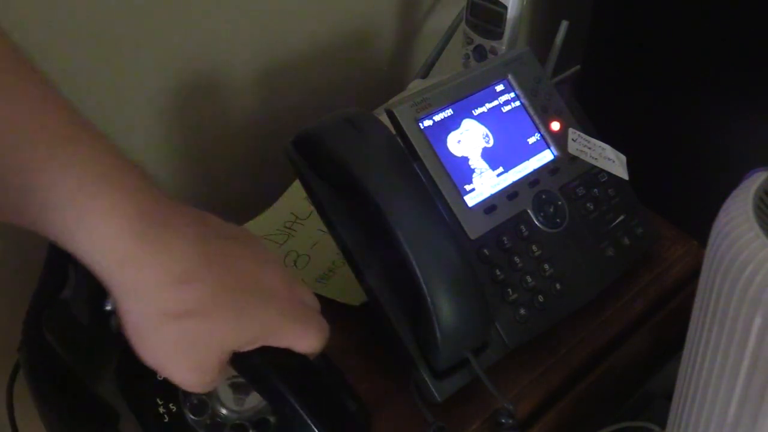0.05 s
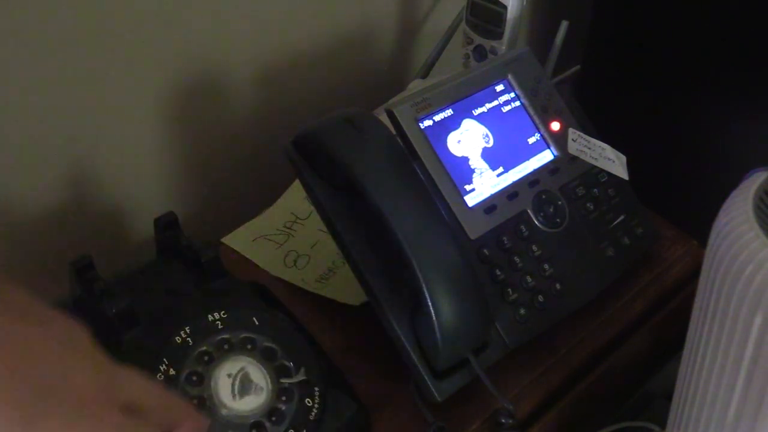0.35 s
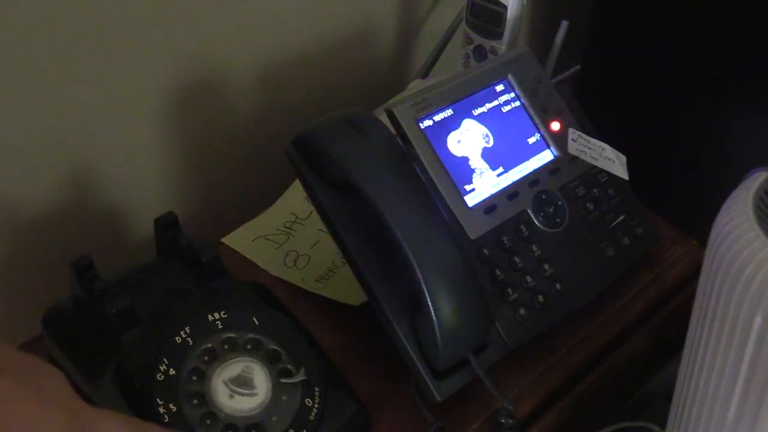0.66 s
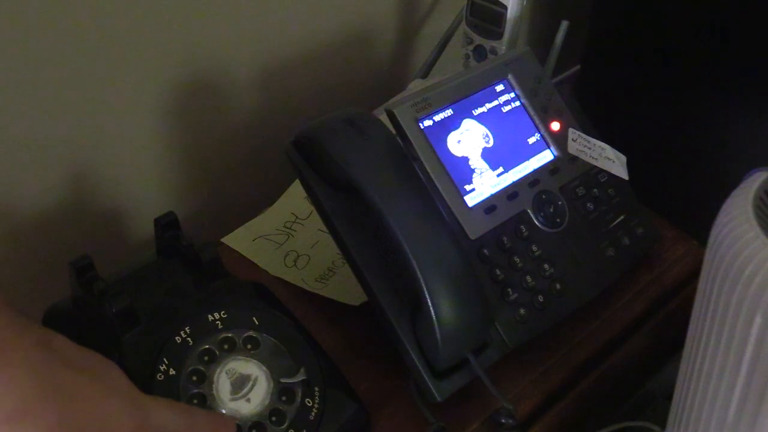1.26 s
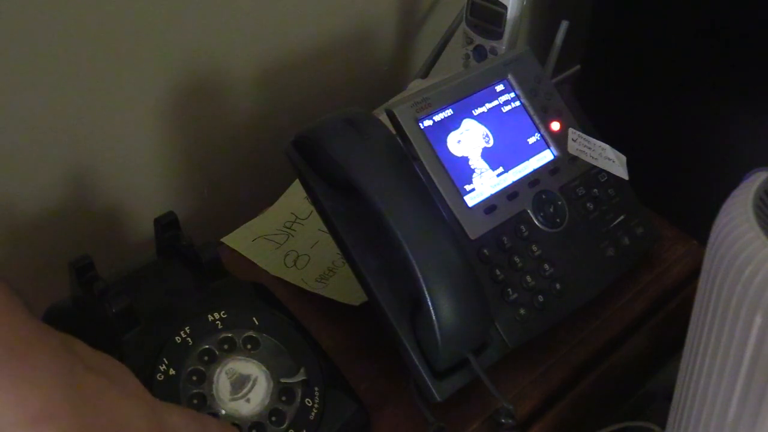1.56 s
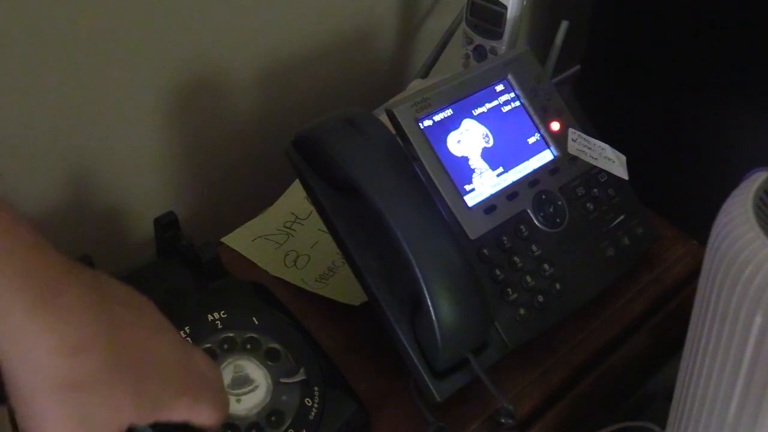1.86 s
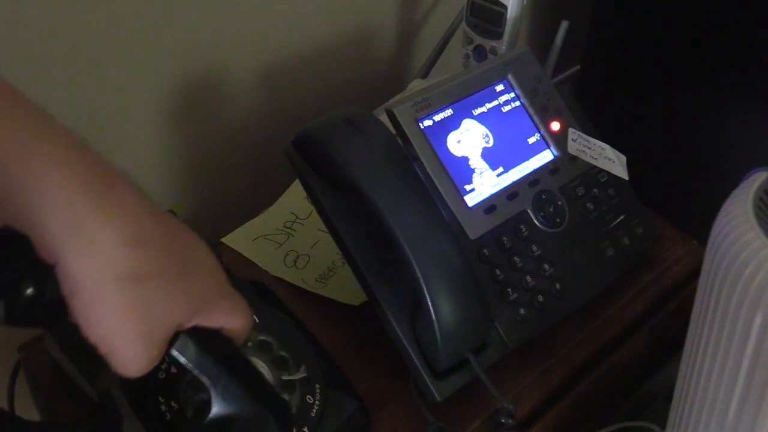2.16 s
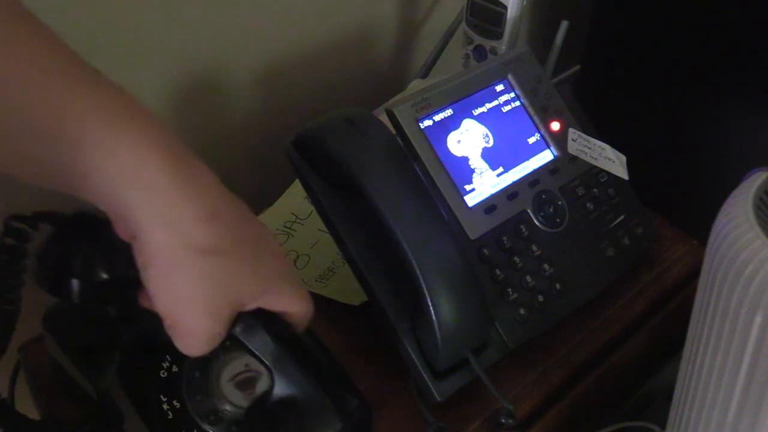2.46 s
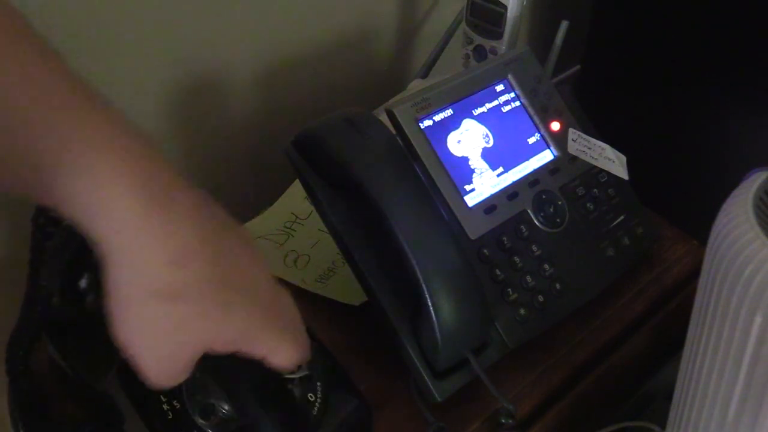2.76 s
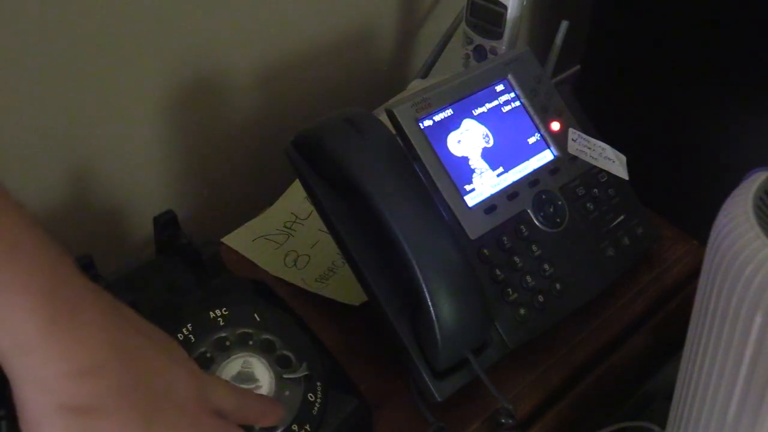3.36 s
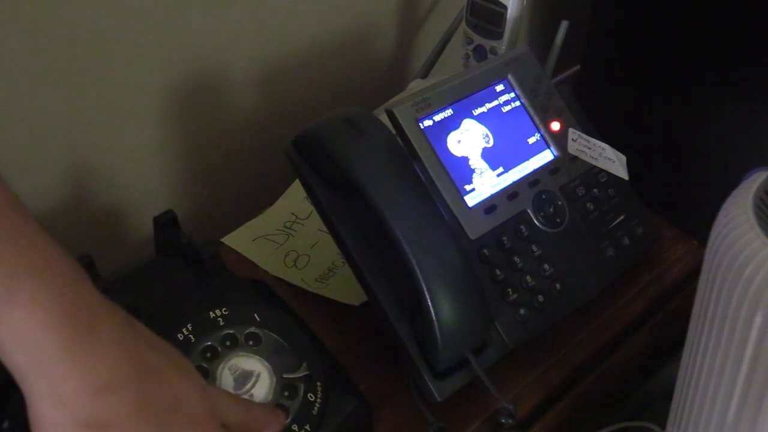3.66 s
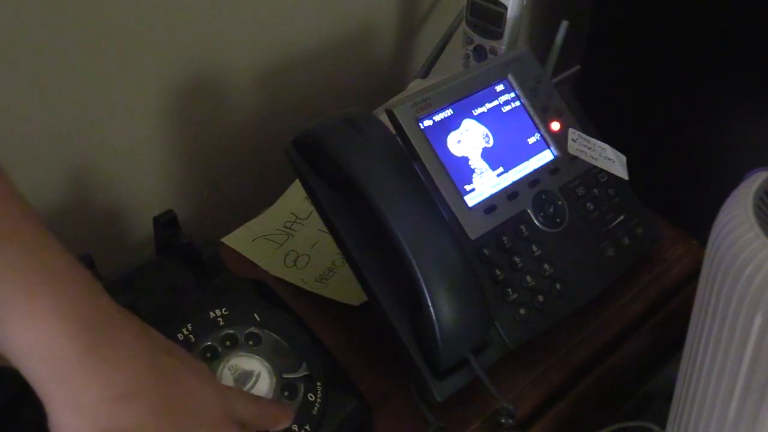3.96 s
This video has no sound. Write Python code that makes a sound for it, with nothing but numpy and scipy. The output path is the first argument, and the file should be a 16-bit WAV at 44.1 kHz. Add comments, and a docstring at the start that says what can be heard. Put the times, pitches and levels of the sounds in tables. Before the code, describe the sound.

Close to the microphone in a quiet room, an old rotary phone is dialed: a few clicks, a whirring return and a metallic clack, then ticking winding, more knocks, and a second whir ending in a clack.

```python
"""An old rotary telephone, dialled on a desk in a quiet room, with one microphone on the left channel.
The finger lets go, the wheel whirs home against its governor and clacks into its rest.
It is wound again over a ticking ratchet, knocks on the finger stop, and runs home once more.
The case rings with the knocks and the hand bumps the telephone on the desk. Behind it are a short
echo and the room's low rumble; the idle right channel carries only hiss."""
import sys
import numpy as np
from scipy import signal
from scipy.fft import rfft, irfft
from scipy.io import wavfile
from scipy.ndimage import uniform_filter1d

SR = 44100
rng = np.random.default_rng(int(sys.argv[2]) if len(sys.argv) > 2 else 0)


def store_wav(level_fs):
    """Save 16-bit WAV to argv[1]."""
    pcm = np.round(np.clip(np.atleast_2d(level_fs), -1, 1) * 32767)
    wavfile.write(sys.argv[1], SR, pcm.T.astype(np.int16))


N = 4 * SR
TIME = np.arange(N) / SR


def amp(db):
    """Decibels to gain."""
    return 10 ** (np.asarray(db) / 20)


def unit_rms(x):
    """Scales to rms 1."""
    return x / np.sqrt(np.mean(x ** 2) + 1e-20)


def fader(points):
    """A gain that moves through points of seconds and dB."""
    return amp(np.interp(TIME, *np.transpose(points)))


def curve_at(points, hz):
    """Reads a curve on a log-frequency axis."""
    point_hz, value = np.transpose(points)
    return np.interp(np.log(hz + 1), np.log(point_hz + 1), value)


def add(mix, start_s, sound):
    """Mixes a sound in at its start time."""
    part = mix[max(round(start_s * SR), 0):][:len(sound)]
    part += sound[:len(part)]


def colour(x, spectrum, modes=(), size=16384):
    """Causal filter of unit energy: a broad spectrum times ringing resonances."""
    hz = abs(np.fft.fftfreq(size, 1 / SR))
    boost = 1 + sum(amp(db) ** 2 / (1 + (2 * (hz - f) / width) ** 2) for f, width, db in modes)
    log_gain = np.log(amp(curve_at(spectrum, hz)) * np.sqrt(boost))
    minimum_phase = np.exp(np.conj(signal.hilbert(log_gain)))
    ring = np.fft.ifft(minimum_phase).real[:size // 2]
    return signal.oaconvolve(x, ring / np.linalg.norm(ring))[:N]


def tone(hz, t60):
    """One dying mode, falling at 60 dB per t60 seconds."""
    t = TIME[:SR // 4]
    return amp(-60 * t / t60) * np.sin(2 * np.pi * hz * t)


def ringing(force, modes):
    """A force rings a set of dying modes whose response has unit energy."""
    ring = sum(amp(db) * tone(hz, t60) for hz, db, t60 in modes)
    return signal.oaconvolve(force, ring / np.linalg.norm(ring))[:N]


def contact(decay_s, rise_s=0.00096, size=2048):
    """A short chattering contact that swells and dies, with the energy of 10 ms at level 1."""
    t = TIME[:size]
    fade = np.exp(-t / decay_s) * (1 - np.exp(-t / rise_s))
    force = rng.standard_normal(size) * fade
    for _ in range(3):  # flatten the spectrum, then restore the envelope
        spectrum = rfft(force)
        force = irfft(spectrum / (abs(spectrum) + 1e-12))
        force *= fade / np.sqrt(uniform_filter1d(force ** 2, size=64) + 1e-9)
    return force / np.linalg.norm(force) * np.sqrt(SR / 100)


def grit(spread_db=3, grain_samples=25):
    """Dense tiny impacts of uneven size."""
    noise = rng.standard_normal(N)
    unevenness = uniform_filter1d(rng.standard_normal(N), grain_samples) * np.sqrt(grain_samples)
    return unit_rms(noise * amp(spread_db * unevenness))


# Resonances of the case and dial plate, heard in most of the dial's sounds.
# Each row: frequency in Hz, width in Hz, boost in dB.
CASE_MODES = [(543.7, 20, 18.5), (597, 19.4, 13.5), (640, 26.6, 15), (881, 34, 7.5), (1033, 27, 11.5),
              (1146, 38, 14), (1597, 78, 7.5), (1896, 80, 4.5), (2091, 57, 8.5), (2740, 31, 3.5),
              (3127, 58, 4.5), (3580, 15, 10), (3996, 58, 3.5)]
# Knocks at the dial. Each row: start in seconds, an unused peak level, then case, low-mid, mid,
# treble and top levels in dB before each band's trim, decay in seconds.
KNOCKS = [(0.0, -19, -28.5, -40, -36.5, -42.5, -47.5, 0.0052), (0.01, -27, -30, -53, -41, -47, -53, 0.0045),
          (0.021, -30, -40, -44, -50, -46, -53, 0.0066),
          (0.042, -23, -25.5, -40.5, -45.5, -56, -59, 0.0043),
          (0.082, -30, -34.5, -45.5, -41.5, -44.5, -46, 0.0079),
          (0.166, -26, -32.5, -42.5, -37.5, -40, -45.5, 0.0049),
          (0.179, -3, -36, -47, -36, -41, -53, 0.0045), (0.194, -24, -29, -55.5, -58, -43, -53, 0.0044),
          (1.885, -36, -39, -72, -54.5, -53, -55, 0.0055), (2.001, -31, -39.5, -45, -45, -54, -69, 0.0071),
          (2.061, -35, -38, -47.5, -49, -62, -66, 0.004), (2.183, -31, -41.5, -47, -47, -61, -70, 0.0042),
          (2.215, -30, -44, -50, -44, -53, -67, 0.0036), (2.272, -29, -63, -56, -44.5, -48.5, -58, 0.0031),
          (2.595, -17, -33.5, -41.5, -34, -34, -30, 0.0049),
          (2.602, -24, -30, -42.5, -40.5, -42, -45, 0.0033), (2.62, -23, -30, -46, -43, -42, -38, 0.004),
          (2.638, -29, -47, -66, -44, -43.5, -43, 0.0028), (2.683, -33, -35, -42.5, -39, -44, -48, 0.0039),
          (2.753, -35, -36.5, -55, -48.5, -58, -59, 0.003),
          (2.774, -24, -33.5, -48, -48.5, -52, -49.5, 0.0034),
          (2.817, -26, -37, -46.5, -39.5, -51, -48.5, 0.0054),
          (2.85, -29, -64, -47.5, -61, -48.5, -50.5, 0.004)]
# One spectrum for each of those five bands. Each point: frequency in Hz, gain in dB.
KNOCK_SPECTRA = [
    [(50, 3.5), (200, -0.5), (420, -3), (600, -12), (900, -14.5), (2500, -57)],
    [(400, -37), (880, 5.5), (1300, 5), (1900, 7), (3200, -46)],
    [(1100, -31), (2200, 5), (4200, 4.5), (6000, -13)],
    [(3500, -43), (5400, 9), (7600, 4), (10000, -36)],
    [(6000, -23), (8400, 8.5), (11000, -1), (15500, -24)],
]

def knocks(trims_db=(-5, -0.5, -2, -1.5, -3.5)):
    """Finger and wheel knock on the stop and in the holes, each knock dull or bright in its own way."""
    out = np.zeros(N)
    for band, spectrum in enumerate(KNOCK_SPECTRA):
        force = np.zeros(N)
        for start, _, *levels_db, decay_s in KNOCKS:
            add(force, start, amp(levels_db[band] + trims_db[band]) * contact(decay_s))
        out += colour(force, spectrum, CASE_MODES)
    return out


# Friction at the shaft. Each row: time in seconds, level in dB.
RUB_LEVELS = [(0, -40.5), (.05, -44), (.13, -51), (.165, -54), (.24, -88), (1.6, -72), (1.76, -59),
              (1.95, -52.5), (2.15, -53.5), (2.3, -46), (2.44, -48), (2.52, -46), (2.6, -44.5), (2.7, -65),
              (2.76, -51), (2.83, -49), (2.9, -91)]
# Its colour. Each row: frequency in Hz, gain in dB.
RUB_SPECTRUM = [(60, 7), (300, -8.5), (600, -1.5), (800, -6.5), (1400, -11.5), (2200, -8.5), (3300, -14),
                (3750, -6.5), (4500, -16), (5600, -15), (6600, -9.5), (8200, -19.5), (10000, -20),
                (15000, -35)]
# Its thin ring. Each row: frequency in Hz, relative level in dB, t60 in seconds.
RUB_MODES = [(3670, 4, 0.14), (3830, -12, .05), (6440, -2, 0.022)]

def shaft_rub():
    """The wheel rubs on its shaft under the finger."""
    friction = grit() * fader(RUB_LEVELS)
    return colour(friction, RUB_SPECTRUM, CASE_MODES) + 0.17 * ringing(friction, RUB_MODES)


# The heavier presses. Each row: start in seconds, level in dB.
PRESSES = [(.010, -33), (.043, -31.5), (.082, -35.5), (.961, -41.5), (2.25, -58), (2.597, -56), (2.62, -52)]
# The housing's low modes. Each row: frequency in Hz, relative level in dB, t60 in seconds.
HOUSING_MODES = [(137.6, -6, 0.43), (193, 3.5, 0.17), (267, -0.5, 0.13), (367.6, -0.5, 0.32),
                 (436.7, 0, 0.35)]

def housing_booms():
    """The hollow housing rings when it is pressed hard."""
    force = np.zeros(N)
    for start, db in PRESSES:
        add(force, start, amp(db) * contact(decay_s=0.002))
    return ringing(force, HOUSING_MODES)


# Knocks that leave a clear pitch. Each row: start in seconds, pitch in Hz, level in dB, t60 in seconds.
CHINKS = [(.044, 1180, -33, 0.053), (0.168, 5450, -40, .05), (.194, 7200, -41, .05),
          (2.002, 2500, -44, .05), (2.217, 2300, -37, 0.028), (2.597, 2280, -37, .06),
          (2.620, 595, -24, 0.062), (2.684, 950, -39.5, 0.1), (2.683, 3300, -41.5, 0.073),
          (2.753, 4000, -38, 0.039), (2.774, 3800, -44, 0.044), (2.851, 7400, -38.5, 0.047)]

def chinks():
    """The wheel and the finger stop ring briefly after a knock."""
    out = np.zeros(N)
    for start, hz, db, t60 in CHINKS:
        add(out, start, amp(db) * tone(hz, t60))
    return out


# The wheel's runs home. Each row: start and end in seconds, level in dB, governor turns per second,
# a moment in seconds at which a turn begins.
RETURNS = [(0.167, 0.96, -42.5, 18.8, .251), (2.788, 3.614, -42, 18.72, 2.903)]
# The governor's catches. Each row: place as a share of the turn, gear weight, brake weight.
CATCHES = [(0.352, 0.94, 1.1), (0.701, 0.17, .35), (0.929, 0.67, 2.3)]
# The colours of gears and brake. Each row: frequency in Hz, gain in dB.
GEAR_SPECTRUM = [(40, -8.5), (150, -2), (300, 0.5), (470, -5), (540, -1), (640, -1.5), (730, -8.5),
                 (1130, -7.5), (1350, -14), (1900, -9), (3200, -13.5), (4500, -19), (9000, -29),
                 (15000, -42)]
BRAKE_SPECTRUM = [(1000, -25), (3000, 8), (4500, 0), (6500, 2), (8700, -1.5), (11000, -8.5), (15000, -30)]
# The gear train's hum. Each row: frequency in Hz, relative level in dB, t60 in seconds.
HUM_MODES = [(549, -0.72, 0.56), (600.6, 0.61, 0.25), (637.6, -2.9, 0.17)]

def return_whir(run_up_s=0.018, slack_db_per_s=-0.5, catch_decay_turns=0.19):
    """Gears chatter and the governor's brake hisses, catching three times in every turn."""
    gears, brake = np.zeros((2, N))
    for start, end, db, turns_per_s, turn_start in RETURNS:
        running = np.clip((TIME - start) / run_up_s, 0, 1) * (TIME < end)
        level = running * amp(db + slack_db_per_s * (TIME - (start + end) / 2))
        turns = (TIME - turn_start) * turns_per_s
        gear_drive, brake_drive = 0.47, 0.21  # the steady part under the catches
        for place, gear_weight, brake_weight in CATCHES:
            catch = np.exp(-((turns - place) % 1) / catch_decay_turns)
            gear_drive += gear_weight * catch
            brake_drive += brake_weight * catch
        gears += level * unit_rms(gear_drive)
        brake += level * unit_rms(brake_drive)
    hum = amp(-8) * ringing(gears * grit(), HUM_MODES)
    chatter = colour(gears * grit(), GEAR_SPECTRUM, CASE_MODES)
    hiss = amp(-17) * colour(brake * grit(), BRAKE_SPECTRUM)
    return hum + chatter + hiss


# The hand bumps the telephone. Each row: start in seconds, rocking level in dB, frequency in Hz,
# decay in seconds, relative thud level in dB.
BUMPS = [(0.267, -33, 45.2, .04, -45), (.447, -37, 35, 0.034, -53), (2.249, -28, 55.7, 0.017, -36),
         (2.552, -31, 22, 0.045, -51), (2.612, -24, 30.5, 0.02, -33), (2.661, -29, 43.4, 0.025, -55),
         (2.797, -27.5, 33.4, 0.022, -36.5)]
# The thud on the desk. Each row: frequency in Hz, gain in dB.
BUMP_SPECTRUM = [(30, 0), (110, 10.5), (230, -5), (500, -48.5)]

def desk_bumps():
    """Low, quickly damped rocking of the telephone under the hand, with a dull thud."""
    rocking, thuds = np.zeros((2, N))
    t = TIME[:SR // 2]
    for start, db, hz, decay_s, thud_db in BUMPS:
        add(rocking, start, amp(db) * np.sin(2 * np.pi * hz * t) * np.exp(-t / decay_s))
        add(thuds, start, amp(thud_db) * contact(decay_s=0.01))
    return rocking + amp(-1.5) * colour(thuds, BUMP_SPECTRUM)


# The wheel lands and rattles. Each row: start and decay in seconds, metal and case levels in dB.
CLACKS = [(0.949, 0.0056, -42, -42), (0.9554, 0.0057, -32.5, -31), (0.9585, 0.0046, -25.5, -30),
          (.9650, 0.0025, -41, -31), (.994, 0.014, -47, -50), (3.604, .008, -47, -47),
          (3.6122, 0.0017, -46, -32), (3.615, 0.0043, -26, -38), (3.6183, 0.0026, -29, -37),
          (3.623, 0.0025, -48, -27), (3.641, 0.0076, -58, -42)]
# The colours of the struck metal and case. Each row: frequency in Hz, gain in dB.
METAL_SPECTRUM = [(940, -15), (1600, -47), (1710, -8.5), (2410, -10), (2860, -5.5), (3080, -6.5),
                  (3490, -2.5), (3800, -6), (4180, 6), (4380, -17), (4510, -3), (4680, -6), (5050, -1),
                  (5300, -1.5), (5830, -4.5), (6170, -1.5), (6650, -0.5), (7180, -1), (7600, -4.5),
                  (8280, 0), (9460, -14), (10200, -9.5), (11000, -18), (13100, -17.5), (15500, -34)]
SLAM_SPECTRUM = [(30, -10), (120, 4.5), (250, 10.5), (400, 1), (560, 3), (760, -9.5), (1130, -4.5),
                 (1500, -14.5), (2500, -9.5), (6000, -31)]

def home_clacks():
    """The wheel hits its rest: bright metal and a thud through the case."""
    metal, case = np.zeros((2, N))
    for start, decay_s, metal_db, case_db in CLACKS:
        add(metal, start, amp(metal_db) * contact(decay_s))
        add(case, start, amp(case_db) * contact(decay_s))
    return colour(metal, METAL_SPECTRUM) + colour(case, SLAM_SPECTRUM, CASE_MODES)


# The finger winds the wheel. Each row: time in seconds, ratchet teeth passed.
WINDING = [(1.785, 0), (1.821, 3), (1.851, 4), (1.885, 6), (1.9052, 7), (1.9255, 8), (1.9428, 9),
           (1.965, 10), (1.9893, 11), (2.033, 13), (2.072, 15), (2.123, 18), (2.154, 20), (2.177, 21),
           (2.199, 22), (2.235, 24), (2.272, 27), (2.368, 35), (2.410, 38), (2.433, 40)]
# The ratchet's strength. Each row: time in seconds, pawl tick and push into the case in relative dB.
RATCHET_LEVELS = [(1.78, -64, -47), (1.85, -54, -48.5), (1.93, -49.5, -42.5), (2.0, -49, -36),
                  (2.07, -57.5, -39), (2.14, -64.5, -35.5), (2.24, -74, -37.5), (2.33, -56.5, -43),
                  (2.43, -50, -37)]
# The colours of tick and push. Each row: frequency in Hz, gain in dB.
PAWL_SPECTRUM = [(500, -26), (1400, -25), (2200, 5.5), (3200, -2.5), (3850, 9), (4500, -2.5), (5500, -6),
                 (6600, 4), (7600, -17), (10000, -8.5), (15000, -37)]
PUSH_SPECTRUM = [(30, 0), (150, 2.5), (300, -3), (450, -6), (600, 2.5), (760, -23), (1130, -11),
                 (1400, -25.5), (2500, -20), (6000, -60)]
# The pawl's ring. Each row: frequency in Hz, relative level in dB, t60 in seconds.
PAWL_MODES = [(3530, -14, .06), (3853, 11, 0.034), (4100, 0, .035)]

def ratchet(tick_decay_s=0.00154, spread_db=1.5, slack_hz=540, tight_hz=631):
    """The pawl drops over each tooth, ringing itself, the dial plate and the case."""
    tooth_times, teeth = np.transpose(WINDING)
    level_times, tick_db, push_db = np.transpose(RATCHET_LEVELS)
    ticks, pushes, plate = np.zeros((3, N))
    for tooth in range(round(teeth[-1]) + 1):
        start = np.interp(tooth, teeth, tooth_times)
        chance_db = spread_db * rng.standard_normal()
        tick = amp(np.interp(start, level_times, tick_db) + chance_db)
        push = amp(np.interp(start, level_times, push_db) + chance_db)
        plate_hz = slack_hz + (tight_hz - slack_hz) * tooth / teeth[-1]  # rises as the spring tightens
        add(ticks, start, tick * contact(tick_decay_s))
        add(pushes, start, push * contact(tick_decay_s))
        add(plate, start, push * tone(plate_hz, t60=0.08))
    pawl = colour(ticks, PAWL_SPECTRUM, CASE_MODES) + 0.62 * ringing(ticks, PAWL_MODES)
    case = amp(-2.5) * colour(pushes, PUSH_SPECTRUM, CASE_MODES)
    return pawl + plate + case


# How long the room rings. Each row: frequency in Hz, t60 in seconds.
ROOM_T60 = [(150, 0.64), (500, 0.27), (2000, 0.22), (7000, 0.18), (15000, .14)]
# The colour of its echo. Each row: frequency in Hz, gain in dB.
ROOM_SPECTRUM = [(100, -4), (700, -5), (1500, 1.5), (6000, -3.5), (15000, 2)]

def room_echo(direct, rise_s=0.0028):
    """A short, diffuse tail reaches the microphone from the desk corner and the walls."""
    hz, t, noise = signal.stft(rng.standard_normal(SR // 2), SR, nperseg=256)
    tail_db = curve_at(ROOM_SPECTRUM, hz)[:, None] - 60 * t / curve_at(ROOM_T60, hz)[:, None]
    _, tail = signal.istft(noise * amp(tail_db), SR)
    tail *= np.minimum(TIME[:len(tail)] / rise_s, 1)
    return signal.fftconvolve(direct, tail / np.linalg.norm(tail))[:N]


# The room's noise floor and rumble at the microphone. Each row: frequency in Hz, gain in dB.
FLOOR_SPECTRUM = [(8, -22.5), (20, -7), (45, -14.5), (108, -23.5), (170, -28.5), (230, -30), (330, -35),
                  (460, -36.5), (620, -40.5), (1040, -44.5), (2640, -51.5), (15500, -59)]
RUMBLE_SPECTRUM = [(15, -1), (35, -2.5), (60, -14), (110, -13), (170, -36.5), (400, -58)]
# The rumble's swells. Each row: time in seconds, level in dB.
RUMBLE_LEVELS = [(0, -64), (.3, -38.5), (.6, -58), (1.1, -44), (1.4, -45), (1.7, -41.5), (2.0, -42.5),
                 (2.3, -49), (2.5, -41.5), (2.65, -55), (2.9, -63), (3.4, -49), (4, -56)]

def room_tone():
    """Behind the telephone lie a steady noise floor and a low rumble that comes and goes."""
    floor = unit_rms(colour(rng.standard_normal(N), FLOOR_SPECTRUM))
    rumble = unit_rms(colour(rng.standard_normal(N), RUMBLE_SPECTRUM))
    return amp(-45.5) * floor + fader(RUMBLE_LEVELS) * rumble


# The idle channel's noise. Each row: frequency in Hz, gain in dB.
HISS_SPECTRUM = [(20, 10), (100, 0), (500, -3.5), (2000, -6), (8000, -7.5), (15500, -10.5)]

def channel_hiss():
    """The channel with no microphone hisses faintly."""
    return amp(-63) * colour(rng.standard_normal(N), HISS_SPECTRUM)


def scene(echo_db=-7.5, mic_gain_db=3.5):
    """Left: the microphone, near enough for the dial to stand above its echo. Right: only hiss."""
    phone = knocks() + shaft_rub() + housing_booms() + chinks()
    phone += return_whir() + home_clacks() + ratchet()
    at_mic = phone + desk_bumps() + amp(echo_db) * room_echo(phone) + room_tone()
    return np.array([amp(mic_gain_db) * at_mic, channel_hiss()])


def record(dry, edge_hz=16000):
    """The recorder's band limit takes off the very top."""
    lowpass = signal.firwin(511, edge_hz, window=("kaiser", 9), fs=SR)
    return signal.oaconvolve(dry, lowpass[None], "same")


dry = scene()
out = record(dry)
store_wav(out)
```